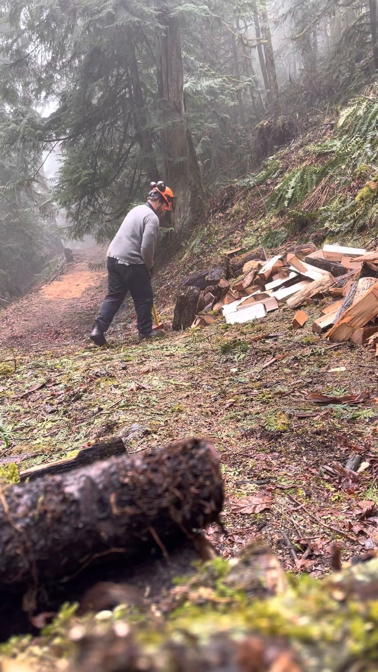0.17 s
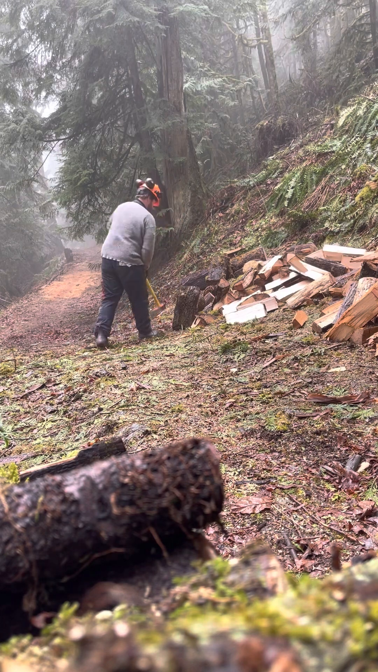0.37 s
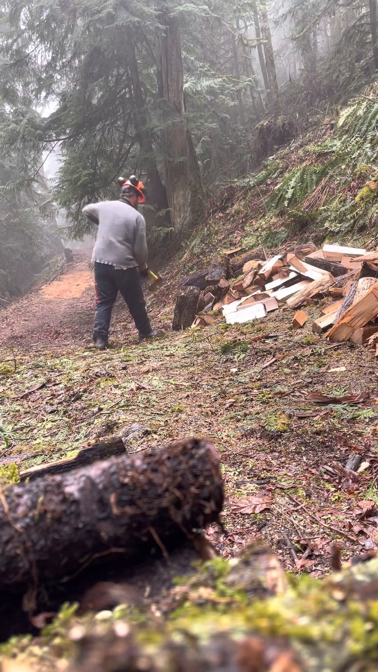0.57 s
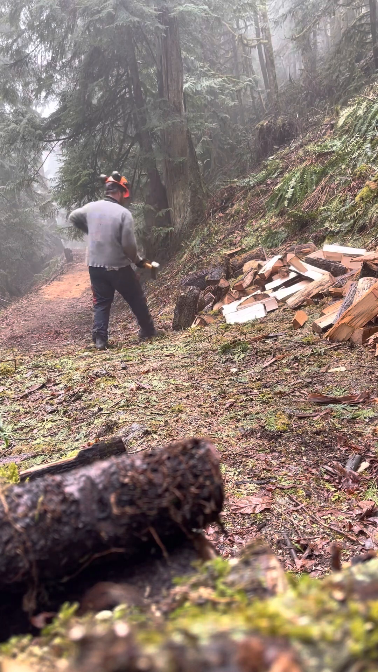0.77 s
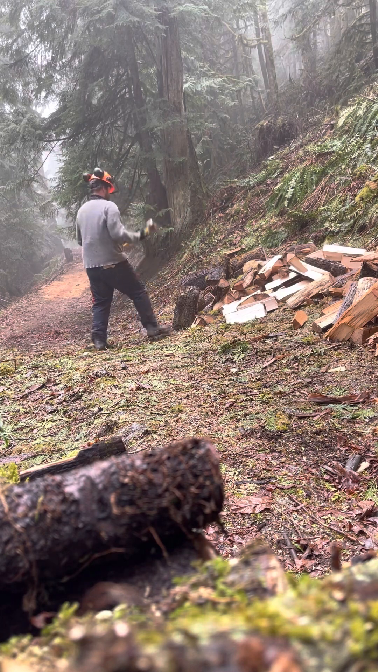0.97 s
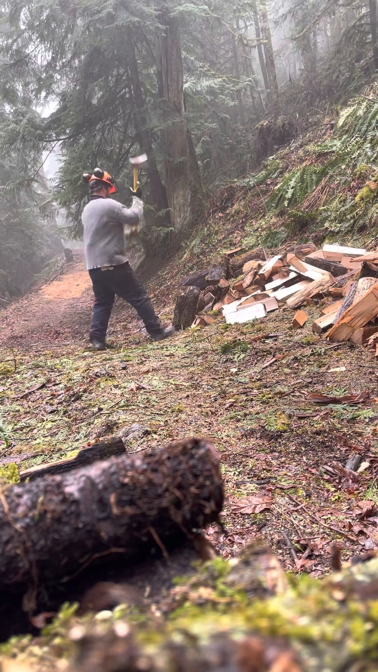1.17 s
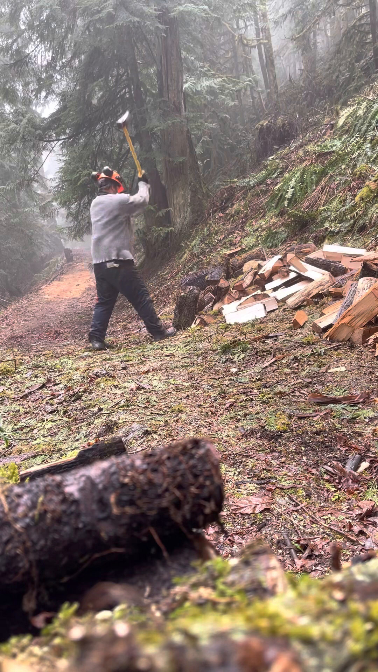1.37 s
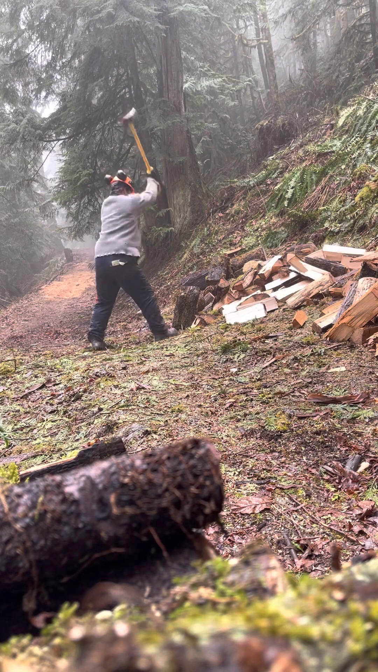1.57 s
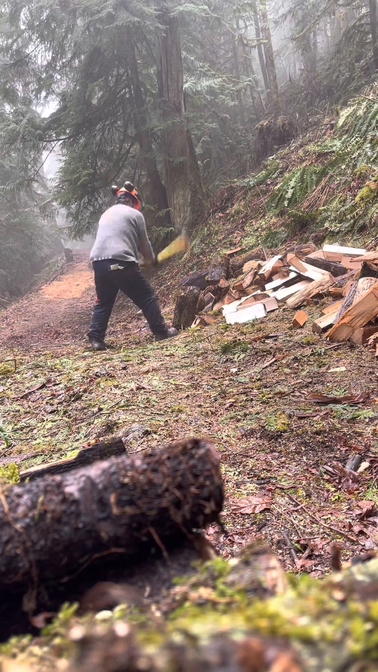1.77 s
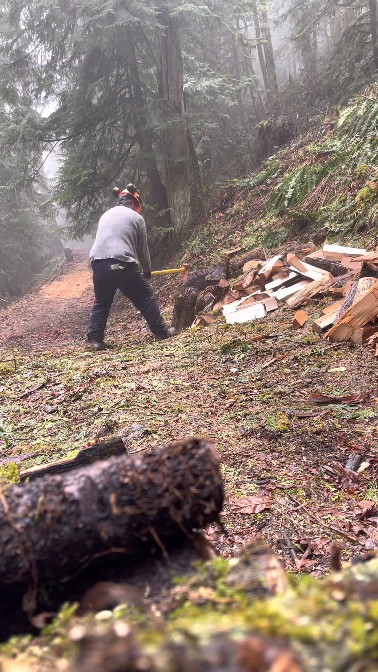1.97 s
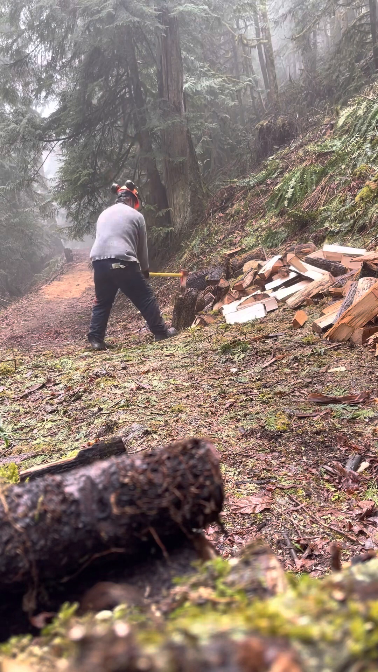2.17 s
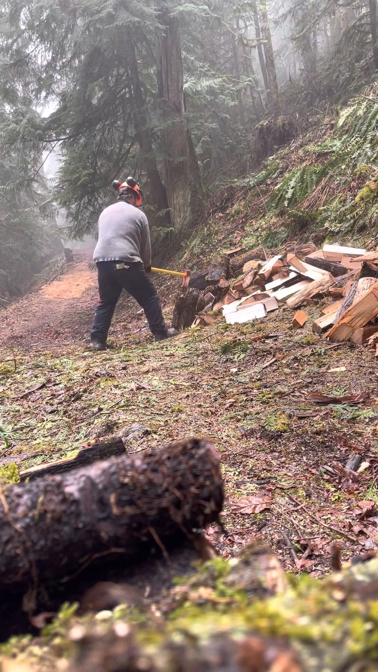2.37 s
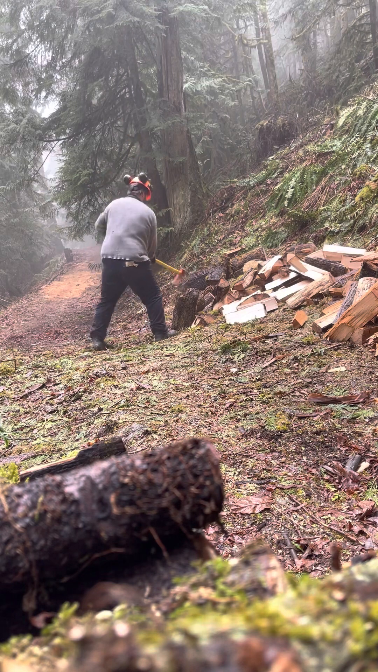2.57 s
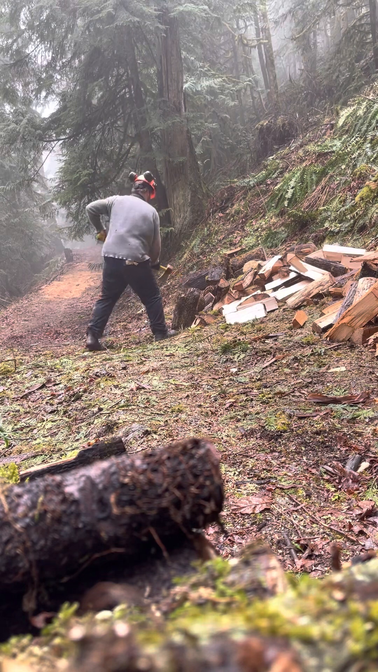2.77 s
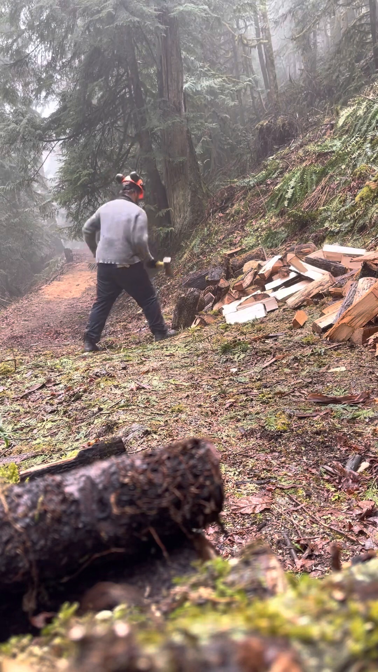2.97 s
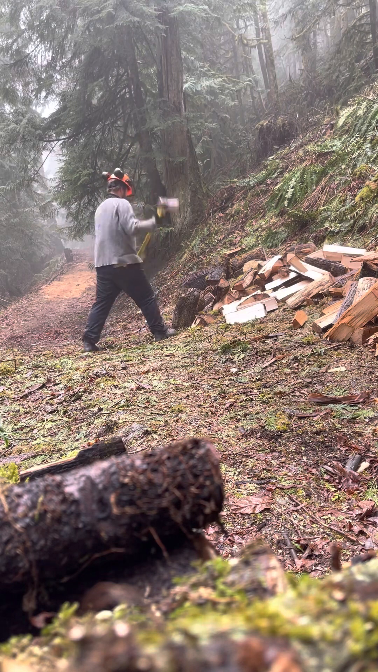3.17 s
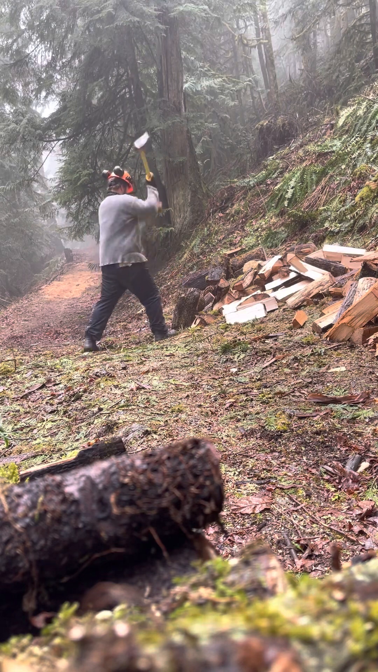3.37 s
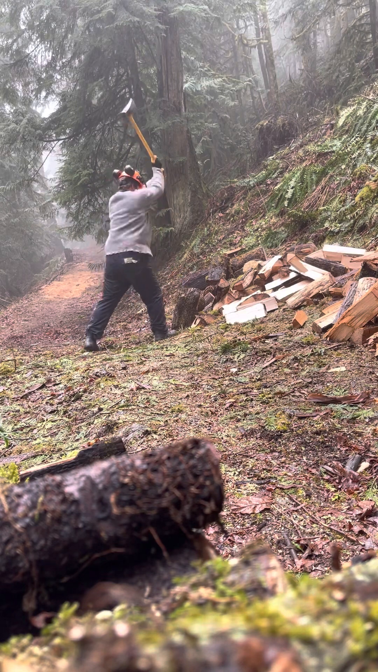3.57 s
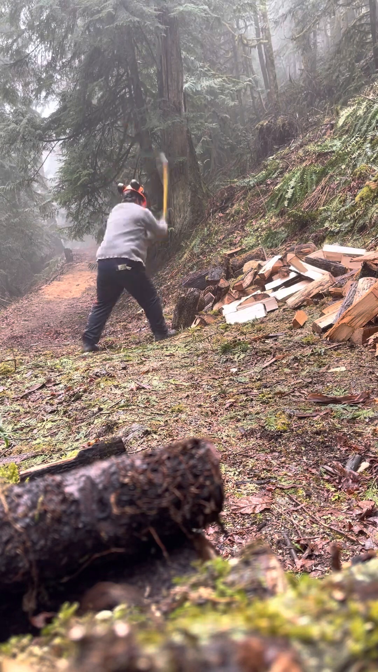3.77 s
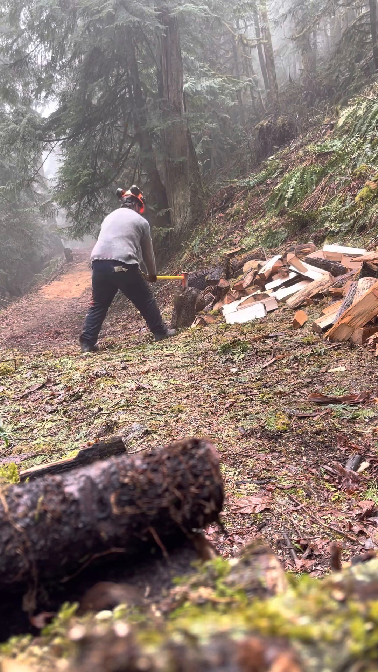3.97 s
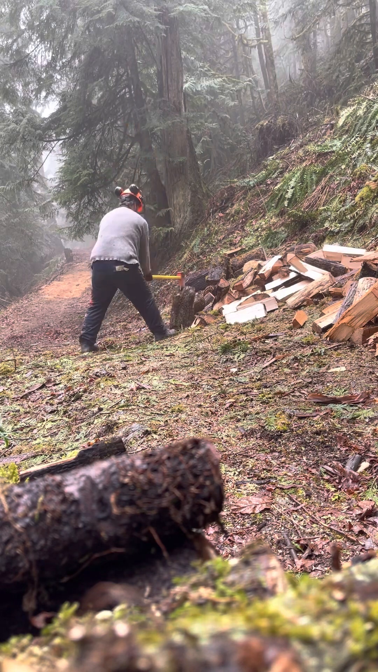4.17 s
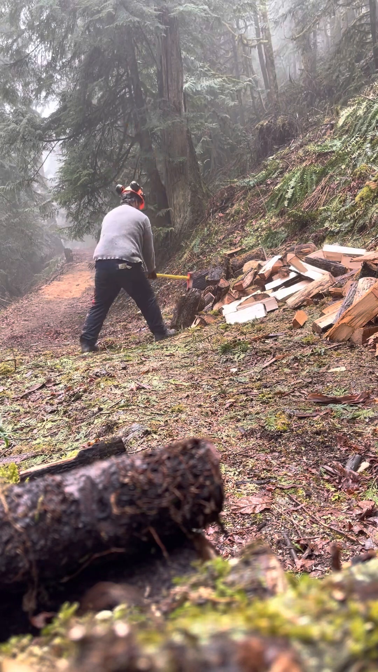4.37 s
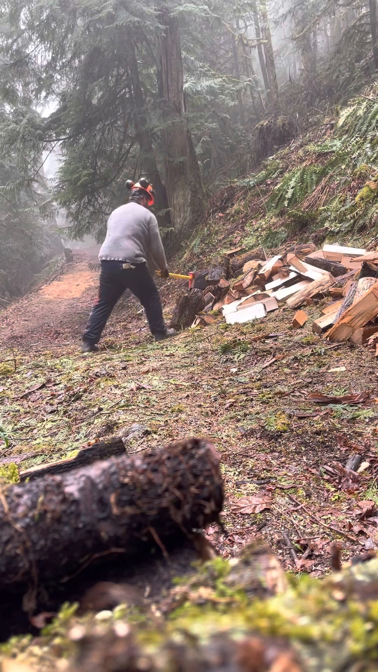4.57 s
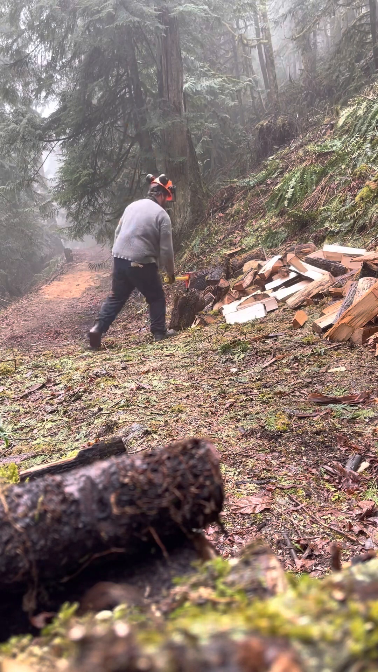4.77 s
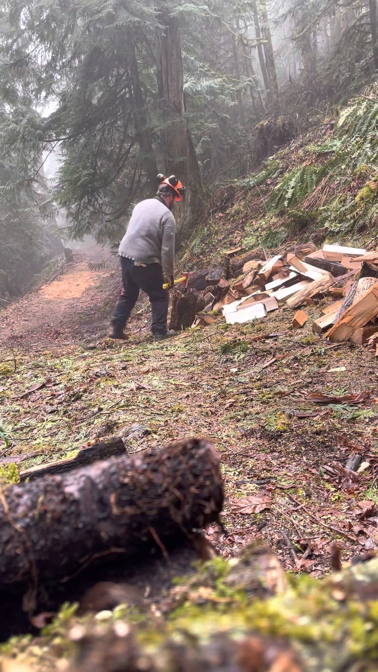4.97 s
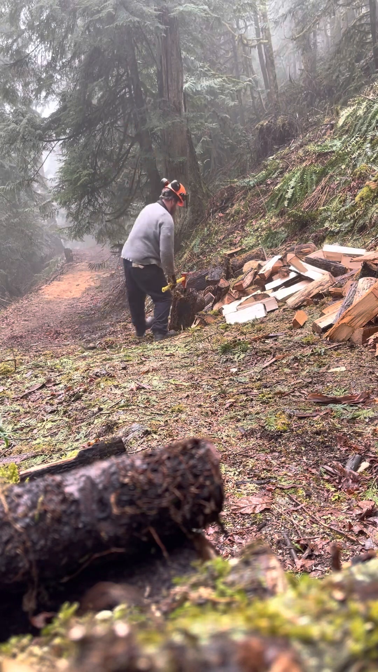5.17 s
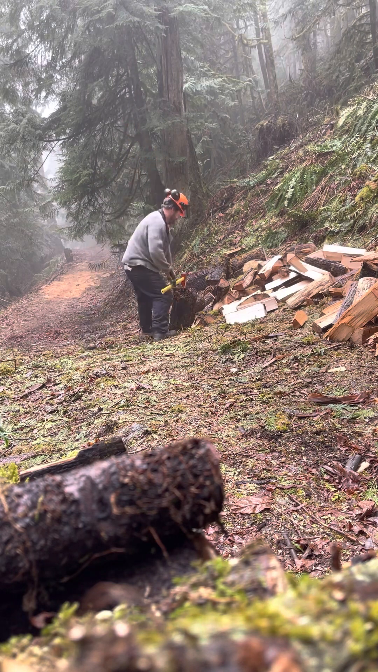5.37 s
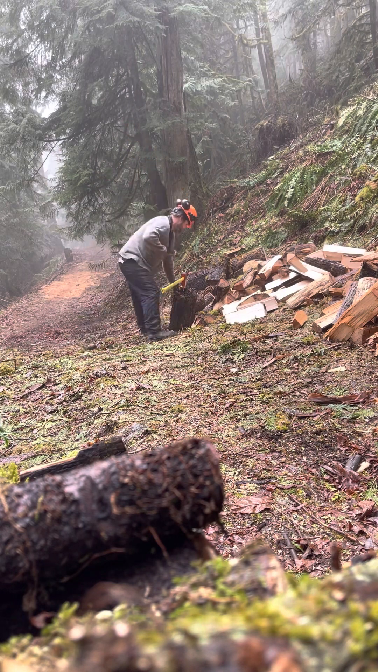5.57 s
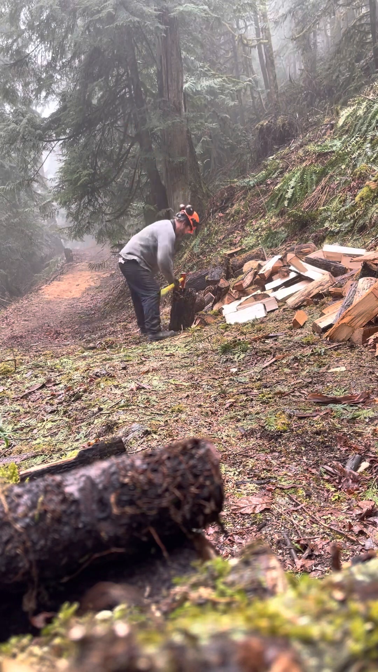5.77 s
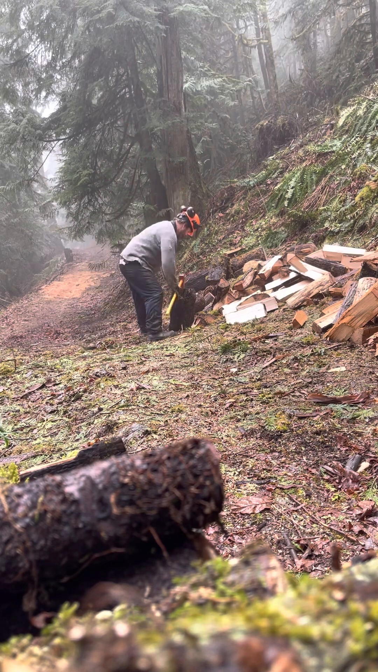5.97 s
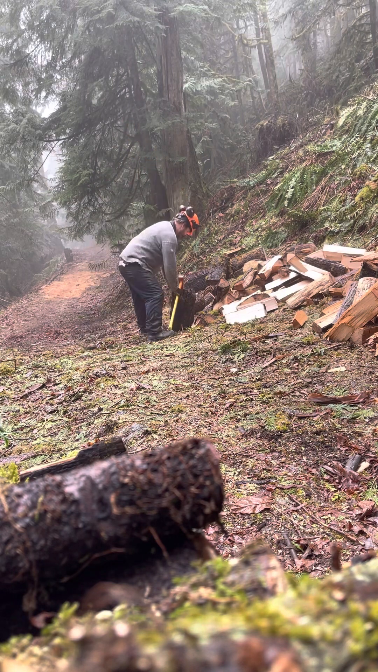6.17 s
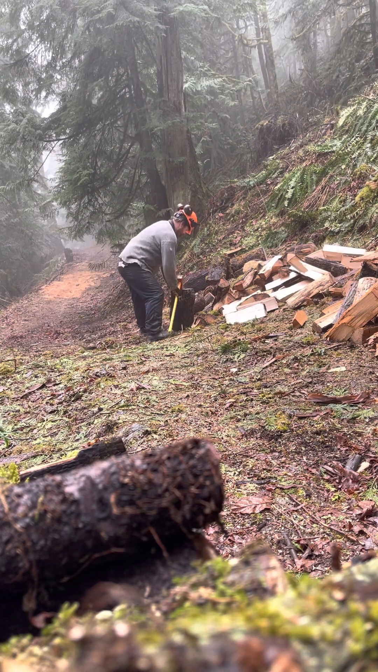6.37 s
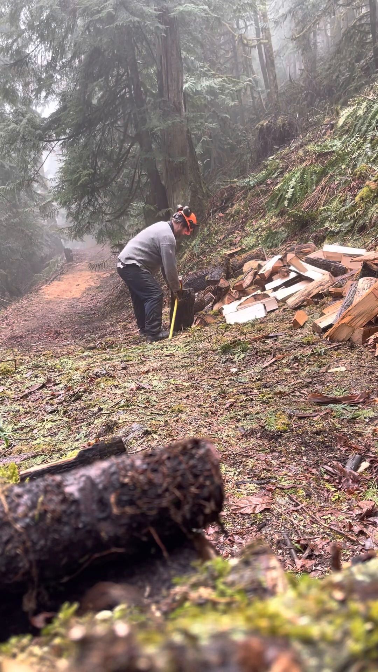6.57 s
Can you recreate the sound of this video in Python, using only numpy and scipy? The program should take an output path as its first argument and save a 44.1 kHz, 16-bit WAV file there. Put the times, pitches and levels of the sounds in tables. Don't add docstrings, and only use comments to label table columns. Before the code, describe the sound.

Outdoors in a quiet forest with a faint low hum, sleeves rustle softly, then an axe strikes a wood round with a sharp, woody crack and a short hollow ring. Trees and a slope echo it while chips patter. A second, similar chop follows two seconds later. Then boots scuff litter, a round drops with a dull knock, and small taps end it. A phone some metres away picks it up in stereo.

```python
import sys
import numpy as np
from scipy import signal
from scipy.fft import rfft, irfft, next_fast_len
from scipy.io import wavfile
from scipy.ndimage import uniform_filter1d

SR = 44100
rng = np.random.default_rng(int(sys.argv[2]) if len(sys.argv) > 2 else 0)


def linear_from_db(decibels):
    return 10 ** (np.asarray(decibels, float) / 20)


def materialize(psi):
    bounded = np.clip(np.atleast_2d(psi).T, -1, 1)
    quanta = np.round(bounded * 32767).astype(np.int16)
    wavfile.write(sys.argv[1], SR, quanta)


N = 292383

# start_s, level_db, contact_ms, echo_share [0-1], tail_length [factor]
BLOWS = [
    (1.83786, 0, 3.2, 0.7, 1.02),
    (3.92842, 0, 4.0, 0.65, 0.9),
]


def evened(x):
    return x / np.sqrt(np.mean(x ** 2) + 1e-20)


def read(points, hz):
    f, value = np.transpose(points)
    return np.interp(np.log(hz + 1), np.log(f + 1), value)


def add(mix, s, sound):
    part = mix[round(s * SR):][:len(sound)]
    part += sound[:len(part)]


def coloured(x, points):
    count = x.shape[-1]
    size = next_fast_len(count)
    gain = linear_from_db(read(points, np.fft.rfftfreq(size, 1 / SR)))
    return irfft(rfft(x, size) * gain, size)[..., :count]


def ring(hz, db, t60, rise_ms):
    t = np.arange(SR // 4) / SR
    rise = 1 - np.exp(-t * 1000 / rise_ms)
    return linear_from_db(db - 60 * t / t60) * rise * np.sin(2 * np.pi * hz * t)


def scattered(count, shape_db, size=512):
    # pitch_hz, likeness [0-1]
    likeness = [(60, 1), (150, 0.8), (400, 0.6), (900, 0.5), (1200, 0.4), (1700, 0.5), (2300, 0.2),
                (3500, 0.7), (5800, 0.09), (7500, .9), (9000, 0.99), (11000, 0.99), (12500, 0.85),
                (16000, 0.85)]
    hop = size // 4
    hz = np.fft.rfftfreq(size, 1 / SR)[:, None]
    t = np.arange(count // hop + 5) * hop / SR
    a, b, c, d = rng.standard_normal((len(t), len(hz), 4)).T
    same = np.clip(read(likeness, hz), 0, 1)
    left = a + 1j * b
    right = same * left + np.sqrt(1 - same ** 2) * (c + 1j * d)
    z = np.array([left, right]) * linear_from_db(shape_db(hz, t))
    return signal.istft(z, nperseg=size, noverlap=size - hop)[1][:, :count]


def swell(peak, length, db):
    rise_share, ends_db, bluntness = 0.22, -25, 2.6
    t = np.arange(0, N, 64) / SR - peak
    away = np.where(t < 0, -t / rise_share, t / (1 - rise_share)) / length
    power = linear_from_db(2 * (ends_db * away ** bluntness + db))
    return np.repeat(power, 64)[:N]


def folds(hz, t):
    patches = rng.standard_normal((len(t), len(hz))).T
    patches = uniform_filter1d(patches, size=9, axis=0)
    return 1.45 * evened(uniform_filter1d(patches, size=14, axis=1))


def ringing_wood():
    # pitch_hz, level_db, t60_s
    wood_modes = [
        [(58.6, -15, 0.069), (124, -15, 0.052), (171, -3.5, .028), (261.1, -6, 0.036), (343, -11.5, 0.048),
         (450, -1.5, .021), (582, -20.5, 0.075), (573, 7.5, .013), (720, 5.5, 0.0075), (950, -10, 0.011),
         (1570, -28, 0.02)],
        [(59, -16, 0.089), (130, -11.5, .1), (167, -2, 0.042), (235, 8, .021), (352, 8, 0.017),
         (481, 3.5, 0.016), (613, 3, .026), (539, 6.5, 0.014), (707, -14, 0.024), (807, -5, .01)],
    ]
    out = np.zeros(N)
    for (s, blow_db, contact_ms, *_), modes in zip(BLOWS, wood_modes):
        add(out, s, linear_from_db(blow_db) * sum(ring(*mode, contact_ms) for mode in modes))
    return out


def tearing_fibres():
    # after_contact_ms, level_db, length_ms
    fibre_snaps = [
        [(1.0, -33, .7), (2.9, -18, 1.3), (6.2, -25.5, 0.63), (8.4, -26, 0.29), (12, -36, 0.41)],
        [(1.6, -22.5, 0.46), (4.0, -18.5, 0.7), (6.6, -30, 1.5), (10, -36, 0.7), (18, -43, 0.91)],
    ]
    # pitch_hz, level_db
    tear_colours = [
        [(500, -28), (1400, -17), (2100, -22), (3600, -7), (5000, -10.5), (5900, -19), (8500, -16), (10600, -9),
         (11600, -15.5), (14000, -21.5), (16000, -26.5)],
        [(500, -37.5), (1400, -20), (2500, -17), (3700, -11.5), (5500, -14), (7500, -11), (10600, -5),
         (11600, -16), (12900, -10), (13800, 2), (16000, 0), (17000, -30)],
    ]
    lead_s = 0.0004
    out = np.zeros(N)
    ms = np.arange(SR // 20) / SR * 1000
    for (s, *_), snaps, colour in zip(BLOWS, fibre_snaps, tear_colours):
        tearing = sum(linear_from_db(db) * np.exp(-.5 * ((ms - at) / length) ** 2) for at, db, length in snaps)
        add(out, s - lead_s, tearing * evened(coloured(rng.standard_normal(len(ms)), colour)))
    return out


def ringing_slivers():
    # start_s, level_db, pitch_hz, t60_s
    sliver_modes = [(1.839, -19, 1170, .011), (1.839, -23, 1462, .013), (1.839, -27, 2046, .012),
                    (1.839, -22, 2845, .011), (1.8394, -22, 3330, .01), (1.8393, -13, 3720, .01),
                    (1.84, -22, 4333, .011), (1.8405, -20, 5250, .01), (1.844, -25, 4950, .01),
                    (1.843, -26, 3254, .012), (3.929, -15, 965, .024), (3.9297, -18, 1130, .012),
                    (3.9345, -21, 1120, .016), (3.9295, -21, 1438, .013), (3.9297, -24, 1610, .013),
                    (3.928, -34, 2650, .012), (3.9298, -28, 3100, .008), (3.9325, -27, 3230, .012),
                    (3.93, -26, 3560, .012), (3.9305, -20, 4090, .011), (3.9302, -31, 5034, .01),
                    (3.9302, -28.5, 5390, .01), (3.931, -24, 10600, .008), (3.945, -40, 3000, .015)]
    out = np.zeros(N)
    for s, db, hz, t60 in sliver_modes:
        add(out, s, ring(hz, db + 2.5, t60, rise_ms=1))
    return out


def axe():
    return ringing_wood() + tearing_fibres() + ringing_slivers()


def slope(blows):
    delay_s, level_db, cutoff_hz = 0.044, -19.5, 348
    out = np.zeros(N)
    dull = signal.lfilter(*signal.butter(2, cutoff_hz, fs=SR), blows)
    add(out, delay_s, linear_from_db(level_db) * dull)
    return out


def forest():
    # pitch_hz, level_db
    sent_colours = [
        [(30, -29.5), (70, -21.5), (150, -27), (300, -35.5), (600, -26), (1100, -29.5), (2500, -37),
         (4000, -35), (5300, -29.5), (6300, -34), (7500, -32.5), (12000, -43.5), (14500, -72)],
        [(30, -24), (70, -18.5), (130, -21), (350, -34), (600, -25), (800, -24), (1100, -28), (2500, -43.5),
         (4000, -47.5), (5300, -41), (6300, -42.5), (7500, -43), (12000, -50.5), (14500, -75.5)],
    ]
    # pitch_hz, t60_s
    far_t60 = [(60, 1.5), (160, 2), (500, 1.7), (1100, 1.1), (3000, 1.12), (5500, 0.67), (9000, 0.59),
               (10500, 0.46), (11300, 0.49), (12300, .26), (13000, 0.22)]
    # pitch_hz, level_over_far_db
    pile_db = [(60, 14.5), (300, 13), (1000, 9.5), (4000, 1.5), (12000, 10)]
    # delay_s, level_over_scatter_db, length_ms
    stands = [(0.017, 1.5, 2), (0.047, 10, 5.4), (0.119, 5.5, 1.3), (.138, 5, 0.89), (.163, 8.5, 2.1),
              (.232, -5, 1.4), (.303, 11, 1.3), (.331, 7, 0.96), (.407, -8, 0.56)]
    pile_t60 = 0.14
    out = np.zeros((N, 2))
    for (s, *_, echo, length), sent in zip(BLOWS, sent_colours):
        def dying(hz, t):
            far = linear_from_db(-60 * t / length / read(far_t60, hz))
            near = linear_from_db(read(pile_db, hz) - 60 * t / pile_t60)
            echoes_db = echo * sum(db * np.exp(-.5 * ((t - delay) * 1000 / ms) ** 2)
                                   for delay, db, ms in stands)
            trunks = uniform_filter1d(rng.standard_normal((len(t), len(hz))).T, size=14, axis=0)
            brief = evened(uniform_filter1d(trunks, size=3, axis=1))
            lasting = evened(uniform_filter1d(np.roll(trunks, 50, 1)[::-1], size=22, axis=1))
            echoes_db = echoes_db + 2.8 * brief + 1.1 * lasting
            return 20 * np.log10(far + near) + echoes_db * hz / (hz + 500)
        tail = coloured(scattered(SR + SR // 2, dying, size=256), sent)[:, :SR + SR // 4]
        onset = np.clip(np.arange(tail.shape[1]) / SR / 0.01, 0, 1)
        add(out, s, (tail * onset).T * linear_from_db(-24.5))
    return out.T


def brief_bursts():
    # start_s, peak_db, pitch_hz
    burst_events = [(1.876, -43, 4500), (1.96, -50, 11000), (1.978, -56.5, 4400), (2.0035, -54, 4000),
                    (2.0022, -54, 8000), (2.033, -60, 3500), (2.071, -58, 3600), (2.072, -63, 7900),
                    (2.09, -55, 4000), (2.1407, -66, 4400), (2.169, -59, 4330), (2.168, -71, 7950),
                    (2.2454, -65, 3430), (4.041, -53, 1200), (4.093, -49, 1500), (4.2334, -56, 1705),
                    (6.071, -69, 3500), (6.1, -61, 1600), (6.14, -59.5, 2900), (6.147, -62, 3200),
                    (6.164, -60, 3000), (6.184, -62, 2950), (6.193, -63, 2900), (6.188, -64, 9050),
                    (6.429, -56, 990), (6.441, -67, 3200), (6.45, -67, 2900)]
    t60, width = 0.011, 0.25
    out, t = np.zeros(N), np.arange(512) / SR
    for s, db, hz in burst_events:
        band = [(hz / 2, -40), (hz / (1 + width), -6), (hz, 0), (hz * (1 + width), -6), (hz * 2, -40)]
        burst = evened(coloured(rng.standard_normal(len(t)), band))
        rise = np.minimum(t * 1000, 1)
        add(out, s, burst * linear_from_db(db + 4 - 60 * t / t60) * rise)
    return out


def thuds():
    # start_s, peak_db, pitch_hz, t60_s
    soil_thuds = [
        (2.091, -38, 166.6, 0.057),
        (5.264, -49, 112, 0.084),
        (5.326, -52.5, 158, 0.059),
        (5.771, -33, 392, 0.018),
        (5.812, -34, 170, 0.016),
        (5.794, -33.5, 124, 0.019),
        (5.833, -34, 165, 0.017),
        (5.856, -43, 185, 0.02),
        (6.423, -66, 457, 0.036),
    ]
    rise_ms = 4
    out = np.zeros(N)
    for s, db, hz, t60 in soil_thuds:
        low = ring(hz, db + 7.0, t60, rise_ms)
        upper = ring(1.39 * hz, db - 3.5, 0.9 * t60, rise_ms / 2)
        add(out, s - .006, low + upper)
    return out


def knocks():
    # start_s, level_db, pitch_hz, t60_s
    wood_knocks = [(1.8535, -25, 3680, .018), (1.879, -33, 550, .045), (1.875, -32, 215, .05),
                   (5.7905, -47, 7200, .008), (6.1163, -54, 2000, .011), (6.116, -55, 1050, .012),
                   (2.091, -42.5, 400, .033), (2.093, -41.5, 287, .021), (5.7702, -39, 1470, .03),
                   (5.772, -41, 964, .035), (5.778, -43, 650, .03), (5.7815, -43, 900, .02),
                   (5.781, -46, 1950, .02), (5.79, -43, 2700, .016), (5.7675, -44, 3000, .016),
                   (5.781, -46, 3450, .015), (5.7905, -41, 4480, .013), (5.7905, -44, 3550, .012),
                   (5.791, -47, 1350, .014), (5.779, -43, 310, .03), (6.1163, -50, 1500, .011),
                   (6.116, -48.5, 680, .023), (6.1165, -51, 3400, .012), (6.4255, -51, 420, .03),
                   (6.427, -52, 700, .017)]
    out = np.zeros(N)
    for s, db, hz, t60 in wood_knocks:
        add(out, s, ring(hz, db, t60, rise_ms=0.043))
    return out


def ticks():
    # start_s, peak_db, pitch_hz, width [share of pitch], t60_s
    dry_ticks = [(0.044, -69, 10700, 0.27, 0.013), (.854, -59.5, 9200, 0.88, 0.016),
                 (1.838, -29, 14800, 0.06, 0.0025), (2.091, -49.5, 12000, 0.4, 0.02),
                 (3.9294, -14, 14800, 0.06, 0.003), (2.526, -62.5, 2602, 0.28, 0.016),
                 (4.233, -60, 10080, .3, 0.0086), (4.657, -63, 3493, 1.6, 0.012),
                 (4.729, -61, 6300, 0.63, 0.0088), (5.471, -58, 11000, 0.3, 0.0068),
                 (5.511, -56.5, 6000, 1.2, 0.0068), (5.765, -54.5, 6000, 2, 0.023),
                 (5.7666, -42.5, 2990, 2.3, 0.04), (5.774, -64.5, 7540, 1, 0.016),
                 (5.781, -43.5, 3480, 0.61, 0.013), (5.791, -32, 8800, 0.6, 0.0086),
                 (6.101, -56, 2837, 0.23, 0.018), (6.428, -63, 3150, 0.16, 0.01),
                 (6.116, -44.5, 3620, 13, 0.02), (6.4282, -58, 1698, 0.25, 0.014),
                 (6.442, -81, 3140, 0.14, 0.041)]
    out, t = np.zeros(N), np.arange(2048) / SR
    for s, db, hz, wide, t60 in dry_ticks:
        spread = 1 + 3 * wide
        band = [(200, -40), (hz / spread, -12), (hz, 0), (hz * spread, -16), (2 * hz * spread, -45)]
        burst = evened(coloured(rng.standard_normal(len(t)), band))
        add(out, s, burst * linear_from_db(db - 1.0 - 60 * t / t60))
    return out


def slides():
    # peak_s, length_s, level_db, pitch_hz, width [share of pitch]
    pitched_slides = [(1.29, 0.3, -75.5, 3800, 0.65), (3.42, 0.14, -76, 8000, 0.15),
                      (3.29, 0.06, -77, 8200, 0.12), (3.36, 0.44, -75, 3600, 0.6),
                      (3.426, 0.12, -72, 6460, 0.16), (1.302, 0.24, -88, 4700, .1),
                      (3.541, 0.1, -85, 3500, 0.38), (5.39, 0.32, -69.5, 1480, 0.13),
                      (5.43, 0.22, -78.5, 3620, .4), (6.148, 0.11, -71.5, 3000, 0.16),
                      (6.443, 0.069, -75.5, 3050, 0.17), (5.899, 0.26, -82, 1920, 0.75),
                      (6.268, 0.2, -89.5, 2874, 0.24)]
    skirt_db = -9.5
    out = np.zeros((2, N))
    for s, length, db, pitch_hz, width in pitched_slides:
        def skirts(hz, _):
            return skirt_db * abs(np.log((hz + 1) / pitch_hz)) / np.log(1 + abs(width))
        start = round((s - .5) * SR)
        band = evened(scattered(SR, skirts))[:, :N - start]
        out[:, start:start + SR] += band * np.sqrt(swell(s, length, db))[start:start + SR]
    return out


def rustle():
    # peak_s, length_s, effort_db, swish_over_rub_db
    movements = [(0.02, 0.081, -85, 0), (0.52, 0.75, -82.5, -5), (0.674, 0.14, -91, -14),
                 (0.775, 0.17, -87.5, 9), (0.882, 0.17, -83.5, -1), (1.156, 0.21, -77, 6),
                 (1.258, 0.4, -77, 2.5), (1.382, 0.3, -86, 2), (1.704, 0.12, -85.5, 2),
                 (1.827, 0.049, -73.5, -1), (2.54, 0.42, -80, -3.5), (2.735, 0.45, -81, 2),
                 (2.927, 0.13, -73, -16), (3.05, 0.43, -80.5, -4), (3.296, 0.23, -79, 8.5),
                 (3.408, 0.39, -82, 5.5), (3.526, 0.16, -78.5, 3), (3.711, 0.52, -82, -4),
                 (3.828, 0.36, -81.5, 0.5), (4.564, 0.38, -89, 0.5), (4.66, 0.12, -77.5, -11),
                 (4.725, 0.093, -78, -11), (4.818, 0.29, -94, 1.5), (5.273, .25, -97, 2),
                 (5.414, 0.25, -80.5, -15), (6.096, 0.19, -75, -12.5), (6.149, 0.16, -76.5, 4),
                 (6.445, 0.057, -78.5, 11.5), (6.472, 0.037, -73, 4.5), (6.613, 0.19, -89.5, -3)]
    # peak_s, length_s, level_db
    litter_drags = [
        (5.263, .2, -69),
        (5.343, 0.3, -65.5),
        (5.484, 0.14, -66),
    ]
    # pitch_hz, level_db
    rub_colour = [(300, -10), (900, 3.5), (1600, 8), (2300, -3), (3600, -2), (5000, -9), (6500, -12),
                  (8000, -17)]
    swish_colour = [(3000, -17.5), (5500, -2.5), (7500, 7), (11000, 2.5), (12000, -9), (13000, -22)]
    scuff_colour = [(120, 10), (250, -2.5), (600, 0.5), (1100, -9), (1600, -7), (2300, -17), (4000, -20.5),
                    (5500, -27.5)]
    rub = sum(swell(s, length, db) for s, length, db, _ in movements)
    swish = sum(swell(s, length, db + bright_db) for s, length, db, bright_db in movements)
    scuff = sum(swell(*drag) for drag in litter_drags)
    spill_s, spill_t60 = 5.785, 0.285
    since = np.arange(N) / SR - spill_s
    spill = (since > 0) * linear_from_db(-60 * abs(since) / spill_t60)
    # power, colour, trim dB, spill dB
    layers = [(rub, rub_colour, 3.0, -55), (swish, swish_colour, -4.0, -59.5), (scuff, scuff_colour, 3.0, -55.5)]
    out = slides()
    for power, colour, trim_db, spill_db in layers:
        level = np.sqrt(power * linear_from_db(trim_db) ** 2 + (spill * linear_from_db(spill_db)) ** 2)
        out += level * evened(scattered(N, lambda hz, t: read(colour, hz) + folds(hz, t)))
    slips_db = 1.8 * evened(uniform_filter1d(rng.standard_normal(N), size=400))
    return linear_from_db(slips_db) * out


def bird():
    # start_s, end_s, pitch_hz, level_db
    calls = [
        (2.33, 2.557, 7380, -88),
        (4.156, 4.5, 8630, -89.5),
        (4.53, 4.802, 7300, -97.5),
    ]
    out = np.zeros(N)
    for start, end, hz, db in calls:
        noise = rng.standard_normal((2, round((end - start) * SR)))
        pitch_waver, level_waver = evened(uniform_filter1d(noise, size=500))
        tone = np.sin(2 * np.pi * np.cumsum(hz + 60 * pitch_waver) / SR)
        add(out, start, tone * linear_from_db(db + 2.7 * level_waver) * np.hanning(len(tone)) ** .5)
    return out


def air():
    # pitch_hz, level_db
    air_colour = [(20, -9), (40, -6.5), (65, 7), (120, -0.5), (200, -10.5), (400, -13), (700, -14.5),
                  (1500, -25), (2200, -32.5), (4000, -37.5), (6000, -36), (11000, -42), (13000, -46)]

    def patchy(hz, t):
        patches = uniform_filter1d(rng.standard_normal((len(hz), len(t))), size=10, axis=0)
        return read(air_colour, hz) + 1.1 * evened(uniform_filter1d(patches, size=12, axis=1))
    return linear_from_db(-63) * evened(scattered(N, patchy, size=2048))


def scene():
    blows = axe()
    returns = slope(blows) + forest()
    handling = brief_bursts() + thuds() + knocks() + ticks()
    return blows + returns + handling + rustle() + bird() + air()


def low_pass(x):
    return signal.sosfilt(signal.butter(12, 16810, fs=SR, output="sos"), x)


def record(dry):
    # pitch_hz, level_db
    port_colour = [(20, -29.5), (40, -6.5), (70, 1.5), (4500, 1), (6200, -4.5), (8500, 1.5), (10500, 12),
                   (11800, 7), (13000, -11), (13700, -34), (15300, -24.5), (16500, -33), (16900, -79)]
    # pitch_hz, lead_rad
    left_lead = [(30, 0), (300, .12), (500, .5), (750, 1.3), (1100, 3.1), (1400, 5.3), (1900, 6.7),
                 (2300, 9.4), (3000, 12.9), (5400, 13.3), (6500, 12.5), (7800, 13.2), (10150, 9.42),
                 (12000, 6.9), (13500, 5.6)]
    # pitch_hz, level_db
    left_louder = [(300, 0), (650, -3.5), (1000, 2.5), (2100, 0), (2800, 8), (4000, 2.5), (7000, 4),
                   (9000, 0.5)]
    size = next_fast_len(N + SR // 4)
    hz = np.fft.rfftfreq(size, 1 / SR)
    lag = np.exp(-2j * np.pi * 1.8 * np.log(hz + 25))
    half = linear_from_db(read(left_louder, hz) / 2) * np.exp(.5j * read(left_lead, hz))
    response = linear_from_db(read(port_colour, hz)) * lag * np.array([half, 1 / half])
    ports = irfft(rfft(dry, size) * response, size)[:, :N]
    return low_pass(ports)


dry = scene()
out = record(dry)
materialize(out)
```